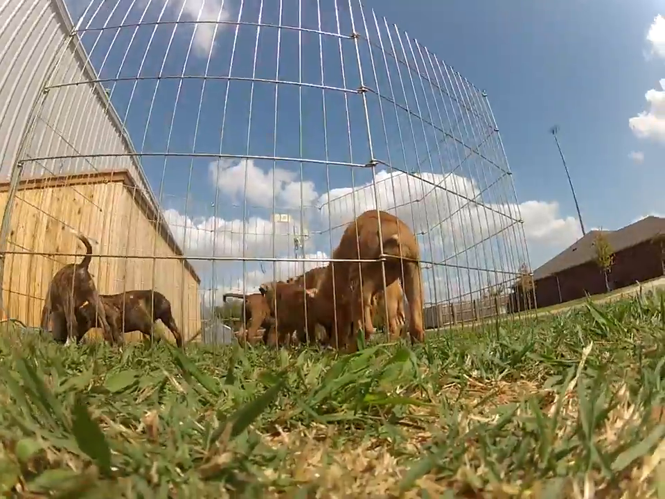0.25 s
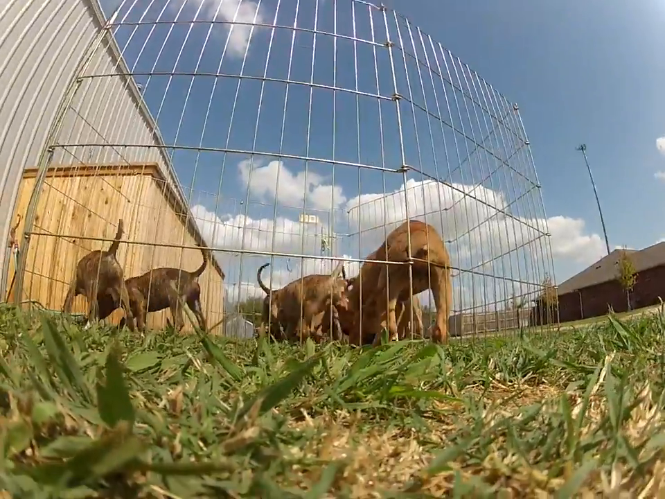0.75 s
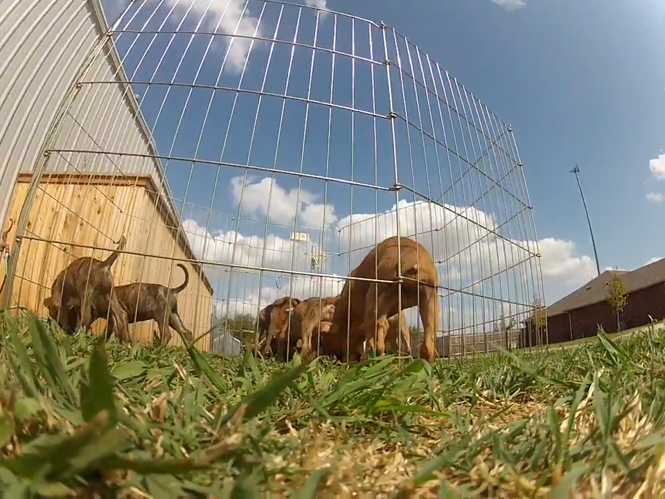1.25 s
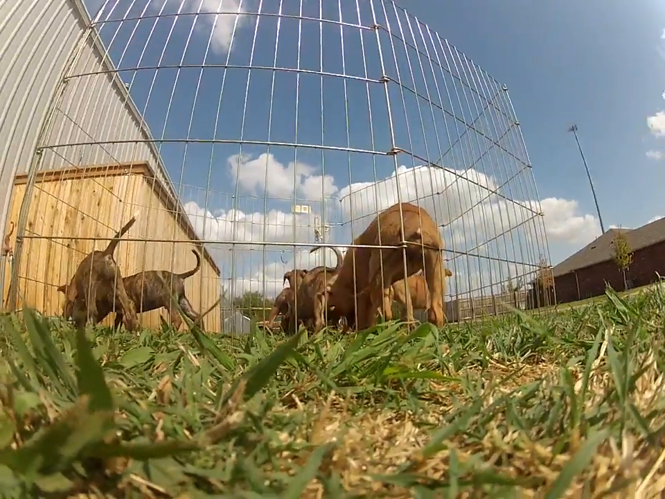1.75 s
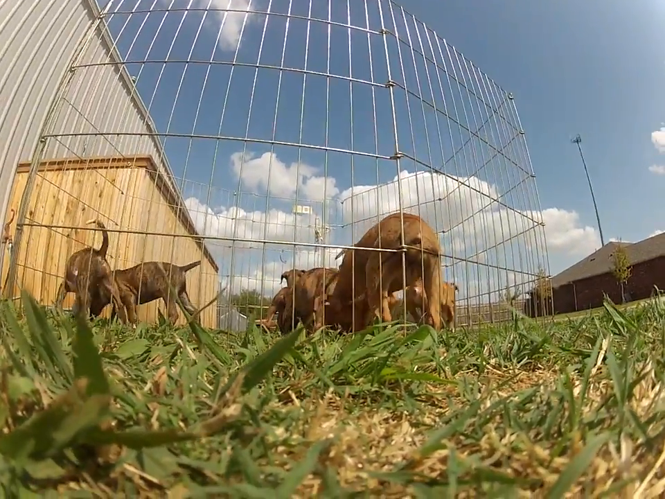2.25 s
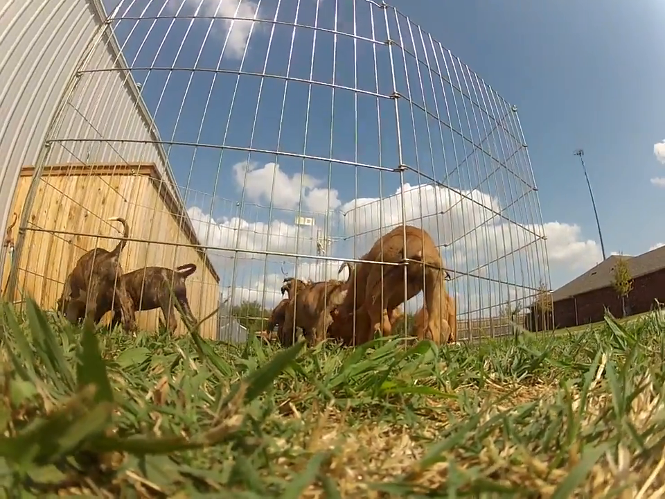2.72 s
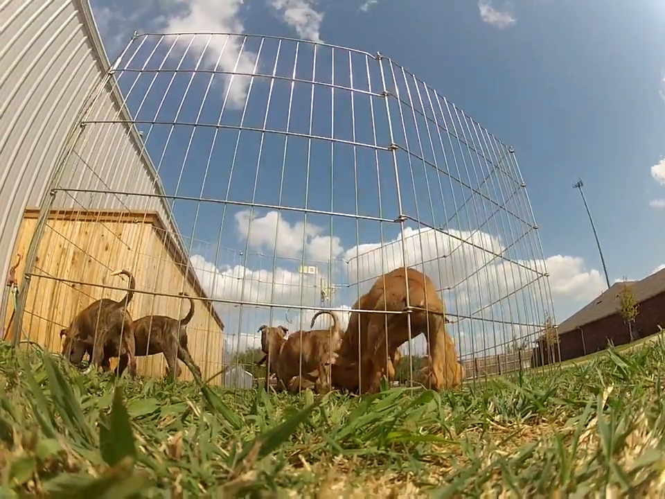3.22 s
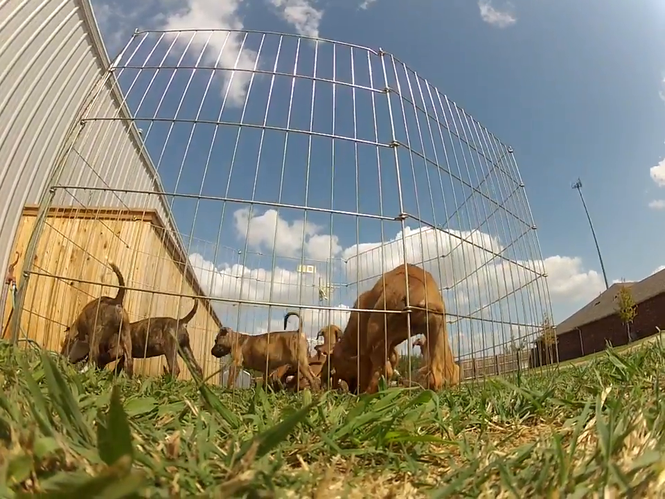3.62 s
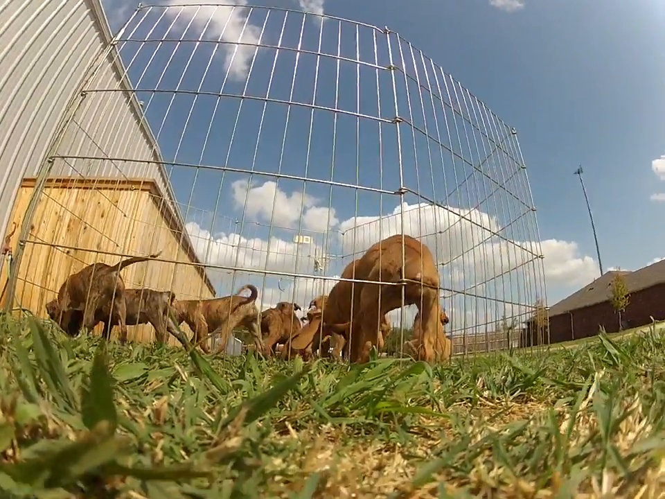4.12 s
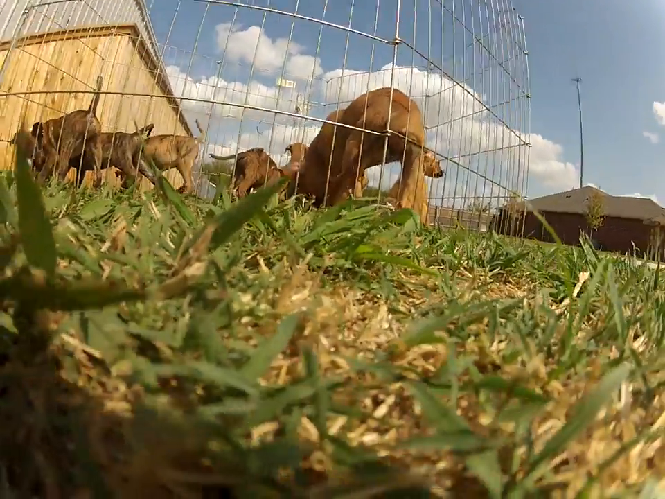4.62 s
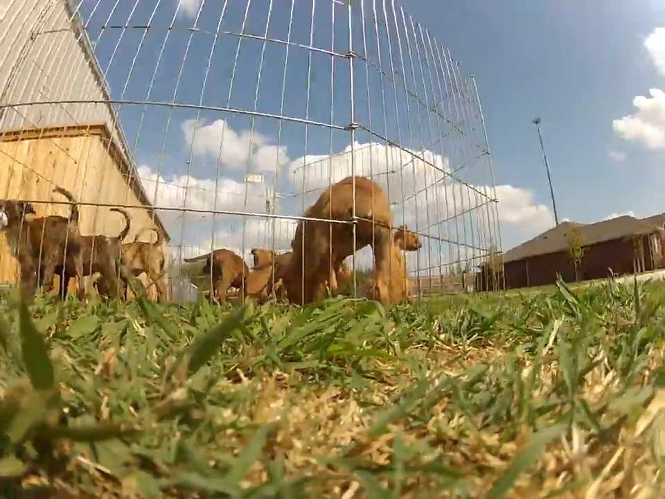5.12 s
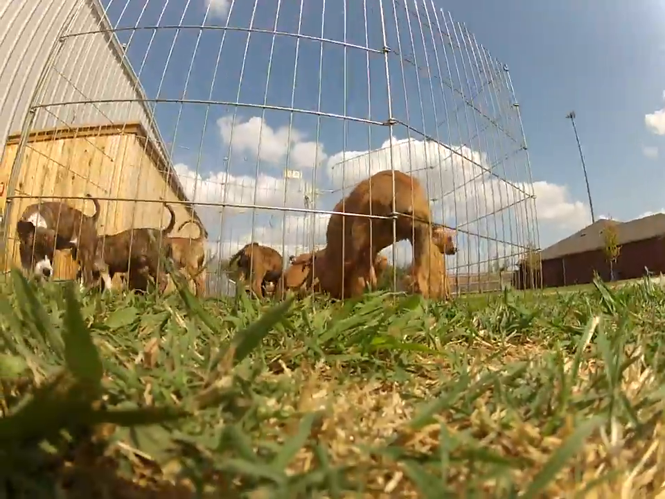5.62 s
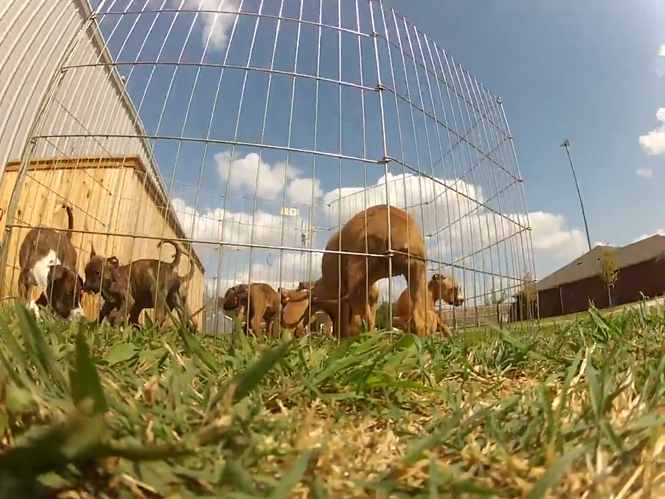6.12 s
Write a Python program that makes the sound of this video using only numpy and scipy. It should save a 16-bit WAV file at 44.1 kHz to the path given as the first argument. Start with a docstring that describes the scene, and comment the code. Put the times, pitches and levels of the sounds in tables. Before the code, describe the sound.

Grass blades brush and snap sharply against a small hard plastic case on a lawn, dry crackles and hollow knocks very close over faint outdoor rumble.

```python
"""Grass against a hard case

A small camera in a hard case slides over a lawn beside a pen of puppies, which stay unheard.
Blades brush, tick and snap: noise bursts coloured by the resonances of the case. Stiffer stalks ring
its shell as decaying sines, and bumps push the whole case as damped swings. Far off a machine hums in
wavering sines over a low outdoor rumble of filtered noise. One microphone feeds two equal channels."""
import sys
import numpy as np
from scipy import signal
from scipy.fft import rfft, irfft, next_fast_len
from scipy.io import wavfile
from scipy.ndimage import uniform_filter1d, map_coordinates

SR = 44100
rng = np.random.default_rng(int(sys.argv[2]) if len(sys.argv) > 2 else 0)


def to_wav(sig):
    """Store sig (one row per channel, or 1-D mono) as 16-bit WAV at the path in sys.argv[1].

    Samples outside -1..1 are clipped; the rate is SR.
    """
    pcm = np.clip(np.atleast_2d(sig), -1, 1) * 32767
    pcm = np.round(pcm).astype(np.int16)
    wavfile.write(sys.argv[1], SR, pcm.T)  # frames by channels


N = 280381


def amp(db):
    """Decibel law: level to amplitude ratio."""
    return 10 ** (np.asarray(db) / 20)


def unit(x):
    """Normalisation to an effective (RMS) value of one."""
    return x / np.sqrt(np.mean(x ** 2) + 1e-20)


def along(points, hz):
    """Spectral envelope: (Hz, value) points joined on a logarithmic frequency axis."""
    f, v = np.transpose(points)
    return np.interp(np.log(hz + 1), np.log(f + 1), v)


def curves(rows):
    """Linear interpolation in time: one value per sample for each column after the time."""
    s, *columns = np.transpose(rows)
    return [np.interp(np.arange(N) / SR, s, column) for column in columns]


def wobble(rate):
    """Slow random modulation: a smooth curve through random knots, rate of them a second."""
    knots = rng.standard_normal(int(N * rate / SR) + 4)
    return map_coordinates(knots, [np.arange(N) * rate / SR])


def filtered(x, response):
    """Linear filtering: the spectrum of x times a response of frequency."""
    m = next_fast_len(N + SR // 2)
    return irfft(rfft(x, m) * response(np.fft.rfftfreq(m, 1 / SR)), m)[..., :N]


def causal(gain, size=4096):
    """Minimum phase: folding the cepstrum makes a filter ring only after its click; unit energy."""
    cepstrum = irfft(np.log(gain(np.fft.rfftfreq(size, 1 / SR)) + 1e-6))
    cepstrum[1:size // 2] *= 2
    cepstrum[size // 2 + 1:] = 0
    response = irfft(np.exp(rfft(cepstrum)))[:size // 4]
    return response / np.linalg.norm(response)


def add(track, s, sound):
    """Superposition: mixes a short sound in at s seconds."""
    part = track[round(s * SR):][:len(sound)]
    part += sound[:len(part)]


def lows(x, hz):
    """First-order low-pass: a gentle slope above hz."""
    return signal.lfilter(*signal.butter(1, hz, fs=SR), x)


# Outdoor rumble and a faint hiss. Each row: frequency in Hz, relative spectral density in dB per Hz.
RUMBLE = [(20, -25.5), (45, -7), (80, -9), (112, -2.5), (135, -7), (165, -7), (300, -12.5), (520, -17),
          (800, -34.5), (3000, -42.5), (6000, -50), (12000, -49.5)]
# Hum of the far machine. Each row: pitch in Hz, RMS level in dB, wavering in dB.
HUM = [(55, -48, 1.4), (410.7, -57.5, .6)]


def distance():
    """Amplitude and frequency modulation: wavering hum lines over an uneven noise rumble."""
    hum = 0
    for hz, db, waver_db in HUM:
        level = np.sqrt(2) * amp(db + waver_db * wobble(7))
        phase = 2 * np.pi * np.cumsum(hz + 0.71 * wobble(8.8)) / SR
        hum = hum + level * np.sin(phase)
    rumble = filtered(rng.standard_normal(N), lambda f: amp(along(RUMBLE, f)))
    rumble_db = -43.5 + .7 * wobble(3) + .8 * wobble(13)
    return hum + amp(rumble_db) * unit(rumble)


# Faint contact with the lawn between strokes. Each row: time in seconds, gain in dB.
CONTACT = [(0, -36), (.3, -43.5), (1.0, -41.5), (1.87, -45.5), (2.1, -40), (3.2, -38), (3.3, -47),
           (3.7, -56.5), (4.1, -44.5), (4.7, -40.5), (5.05, -46), (5.5, -44), (5.8, -50.5), (6.36, -43.5)]
# Tufts dragging across the case. Each row: start in seconds, length in seconds, gain in dB.
STROKES = [(0.089, 0.1, -27), (0.348, 0.062, -31), (0.422, 0.11, -36), (0.552, 0.038, -32),
           (0.769, 0.14, -36.5), (0.902, 0.19, -37.5), (1.141, 0.17, -36.5), (1.435, 0.16, -36.5),
           (1.677, 0.14, -37.5), (1.91, 0.11, -40.5), (2.42, 0.16, -34.5), (2.756, 0.07, -36.5),
           (2.884, 0.11, -33.5), (3.005, 0.039, -31), (3.243, 0.013, -32), (4.001, 0.058, -39.5),
           (4.164, 0.078, -40), (4.266, 0.058, -37.5), (4.448, 0.08, -40.5), (4.588, 0.035, -38),
           (4.814, 0.1, -34.5), (5.08, 0.012, -25), (5.104, 0.12, -41.5), (5.353, 0.02, -39.5),
           (5.456, 0.07, -36.5), (5.572, 0.028, -41.5), (6.133, 0.075, -43.5), (6.292, 0.05, -36.5)]
SWELL_DB, FADE_DB = 27.5, 37  # rise before and fall after a stroke, in dB over its own length


def pressure():
    """Addition of powers: strokes that swell, hold and fade join the faint contact; gives a gain."""
    t = np.arange(N) / SR
    power = amp(2 * curves(CONTACT)[0])
    for s, length, db in STROKES:
        swell_db = SWELL_DB * (s - t)
        fade_db = FADE_DB * (t - s - length)
        down_db = np.maximum(swell_db, fade_db) / max(length, .01)
        power = power + amp(2 * (db - np.maximum(down_db, 0)))
    return np.sqrt(power)


# Cancellations inside the case. Each row: centre in Hz, width in Hz, gain at the centre in dB.
NOTCH = [(2430, 176, -7.5), (5990, 520, -9), (1605, 197, -5.5), (12080, 2850, -41.5), (4190, 67, -4.5)]


def notches(hz):
    """Destructive interference: gain left by the cancellations."""
    gains = [np.hypot(hz - centre, amp(db) * width) / np.hypot(hz - centre, width)
             for centre, width, db in NOTCH]
    return np.prod(gains, axis=0)


def path(spectrum):
    """Impulse response: a way into the microphone, with its resonances and cancellations."""
    return causal(lambda hz: amp(along(spectrum, hz)) * notches(hz))


def patchy(x, depth_db):
    """Time-frequency modulation: each moment and band gets its own gain, as blades differ in size."""
    z = signal.stft(x, nperseg=256)[2]
    field = uniform_filter1d(rng.standard_normal(z.shape), size=5, axis=0)
    field = uniform_filter1d(field, size=3, axis=1)
    rustle = signal.istft(z * amp(depth_db * unit(field)), nperseg=256)[1][:N]
    return unit(rustle)


# The air cavity behind the port rings sharply. Each row: frequency in Hz, relative gain in dB.
CASE = [(1000, -22), (2000, -14.5), (2600, -9), (3050, -3.5), (3800, -7), (4250, -16), (6000, -28),
        (7700, -23), (8200, -12.5), (8900, -10.5), (9500, -19.5), (11000, -36), (14300, -38), (15000, -9.5)]
# The plastic shell passes a broader sound. Each row: frequency in Hz, relative gain in dB.
SHELL = [(500, -3.5), (1050, 3.5), (2000, 6.5), (2500, 5), (3900, 2), (5200, -1.5), (6400, -3.5),
         (8200, -3), (10300, -8), (14000, -6.5)]
# Brushing through the shell against the port. Each row: time in seconds, shell level over port in dB.
LAID = [(0, -23), (.24, -9.5), (.8, -3), (1.5, -0.5), (2.3, 0), (3.8, -3), (4.4, -1.5), (4.9, -6),
        (5.4, 0.5)]


def brushing():
    """Stick-slip friction: clumped tiny ticks, denser under pressure, over a fine uneven hiss.

    Port and shell meet different blades, so each has its own ticks and noise."""
    shell_db, = curves(LAID)
    press = pressure()
    # slips a second: about 360 at the median pressure
    rate = 360 * np.sqrt(press / np.median(press)) * amp(2.5 * wobble(30))
    sizes_db = np.minimum(5.5 * rng.exponential(size=(2, N)), 9)
    slips = (rng.random((2, N)) < rate / SR) * amp(sizes_db)
    ticks = signal.lfilter([1], [1, -np.exp(-1 / (.00035 * SR))], slips)  # decay 0.35 ms
    hiss = amp(2.5 * wobble(70))
    shape = unit(unit(ticks) + [[1.0], [.8]] * hiss)  # rows: port, shell
    rustles = shape * rng.standard_normal((2, N))
    ringing, broad = [patchy(x, depth_db=2.5) for x in rustles]
    through_port = signal.fftconvolve(ringing, path(CASE))[:N]
    through_shell = signal.fftconvolve(broad, path(SHELL))[:N]
    rub = through_port + amp(shell_db) * through_shell
    return press * rub / np.hypot(1, amp(shell_db))  # the share leaves the total power alone


# Blades snapping on the case. Each row: start in seconds, peak in dB before the preamplifier,
# gain of the treble in dB, shell path over port path in dB.
SNAPS = [(0.0998, -5, 8, -30), (0.1326, -8, 6, -30), (0.15, -12, 6, -30), (0.1603, -7, 6, -30),
         (0.26, -15.5, 2, -13), (0.3236, -10, 7, -18), (0.3595, -9.5, -12, 12), (0.372, -10.5, 10, -2),
         (0.543, -14, -1, -9), (0.5838, -14, -1, -5), (0.601, -14, 0, -18), (0.7676, -15.5, 13, -10),
         (0.826, -15, -1, -9), (0.9875, -3, -2.5, -20), (0.9948, -1, 10, -8), (0.959, -15.5, 3, -3),
         (1.1665, -8, 2.5, -5), (1.2632, -10.5, 3.5, -2), (1.5241, -1, 3, 0.5), (2.1346, -2, 0, 11),
         (2.205, -20.5, -2, -6), (2.2918, -18, 14, 17), (2.3811, 0, 14, 4), (2.382, 2, 11, -5),
         (2.4, -1.5, 1, -5), (2.4396, 3, 1, -9), (2.4738, -14, 2, 8), (2.5154, 3, 2, -8),
         (2.567, -18, 23, 11), (2.6432, -16, -2, 24), (2.736, -17, 13, 21), (2.8001, -10.5, -3, -13),
         (2.959, -19, -10, 13), (2.9923, -5, 2, -32), (3.0008, -13, -9, 6), (3.0268, -11, -4, -8),
         (3.2432, -8.5, -4.5, -32), (3.5248, -24, -1, -37), (3.8818, -21.5, -1.5, -1),
         (4.2675, -14.5, 13, -2), (4.317, -19, 17, -7), (4.346, -21, -3, 13), (4.4436, -11.5, 0.5, -11),
         (4.535, -15.5, 6, -10), (4.774, -15, 17, -23), (4.857, -12, 1, -15), (4.9162, -20, 11, 8),
         (4.9315, -14, 0, 0), (4.997, -18.5, 0, 8), (5.1571, -16.5, 4, 4), (5.5735, -6, 11.5, -10),
         (5.595, -15, 13, 13), (5.9531, -7.5, 3, -37), (5.968, -19, -10, -9), (5.971, -8.5, 2, -26),
         (5.9973, -9.5, 4, -10)]
# The clearest blades flicking off the case. Each row: start in seconds, peak in dB.
TICKS = [(.282, -24.5), (0.344, -18.5), (0.7592, -25), (0.94, -24), (1.100, -20), (1.139, -21),
         (1.370, -22.5), (1.603, -17.5), (1.6225, -22), (1.790, -24), (1.923, -21), (1.964, -21.5),
         (1.982, -25), (2.114, -22.5), (2.228, -27), (2.279, -20.5), (2.486, -21), (2.612, -35),
         (3.179, -23), (3.356, -30), (3.413, -32), (3.591, -32), (3.808, -29), (3.847, -26), (4.325, -32),
         (4.363, -18), (4.401, -20), (4.471, -24), (4.495, -24), (4.625, -22.5), (4.942, -25.5),
         (5.293, -21.5), (5.488, -21), (6.131, -27), (6.203, -22), (6.297, -17.5)]
# Decay by way in. Each row: shell path over port path in dB, decay time constant in seconds.
SNAP_S = [(-20, 0.0011), (-12.5, 0.00097), (13.5, 0.0011)]


def snaps():
    """Impulsive excitation: a fast broadband burst dies away with a weak after-rattle.

    A tick reaches port and shell in the same proportion as the brushing does."""
    track, t = np.zeros(N), np.arange(SR // 20) / SR
    case, shell = path(CASE), path(SHELL)
    ticks = [(s, db, 4, np.interp(s, *np.transpose(LAID))) for s, db in TICKS]
    for s, db, bright_db, shell_db in SNAPS + ticks:
        decay = np.interp(shell_db, *np.transpose(SNAP_S))
        crack = (1 - np.exp(-t / .0002)) * np.exp(-t / decay)
        rattle = .05 * np.exp(-t / .0044)
        z = rfft((crack + rattle) * rng.standard_normal(len(t)))
        # a break excites all frequencies about evenly
        even = z / np.sqrt(uniform_filter1d(np.abs(z) ** 2, size=40))
        burst = irfft(even)[:len(t) // 2]
        low = lows(burst, hz=3580)
        tilted = low + amp(bright_db) * (burst - low)
        sound = signal.fftconvolve(tilted, case + amp(shell_db) * shell)
        add(track, s, amp(db) * sound / np.abs(sound).max())
    return track


# Stalks knocking the shell. Each row: start in seconds, starting level of the main mode in dB, pitch in Hz.
KNOCKS = [(0.2449, -29, 385), (2.1345, -1, 2700), (2.3832, -9, 577), (2.5152, -17.5, 570),
          (2.6436, -16.5, 1860), (2.736, -17.5, 1900), (2.801, -10.5, 1840), (2.895, -22, 1000),
          (2.935, -20, 990), (3.0008, -13.5, 1030), (3.0282, -11, 945), (3.243, -19, 1120),
          (3.2435, -6.5, 2770), (3.881, -28.5, 920), (4.916, -24, 1110), (5.9535, -12.5, 2740),
          (5.97, -24, 920), (5.996, -18, 1080)]


def knocks():
    """Damped modes: a stalk rings the plastic shell in two partials for a few cycles."""
    track, t = np.zeros(N), np.arange(SR // 20) / SR
    for s, db, hz in KNOCKS:
        ring = np.sin(2 * np.pi * hz * t) + 0.17 * np.sin(2 * np.pi * 1.56 * hz * t)
        add(track, s, -amp(db - 60 * t * hz / 12) * ring)  # 60 dB down after 12 cycles
    return track


# The case bumping the ground. Each row: start in seconds, level before damping in dB,
# length of the push in seconds (held to 1 ms or more).
BUMPS = [(2.382, -4.5, 0.0016), (2.439, -17, 0.0028), (2.514, -30, 0.00093), (2.745, -23, 0.0027),
         (2.897, -16, 0.0024), (5.728, -24, 0.0048)]


def bumps():
    """Damped oscillation: one soft push of the whole case and its weaker rebounds."""
    track, t = np.zeros(N), np.arange(SR // 20) / SR
    for s, db, length in BUMPS:
        u = t / np.clip(length, .001, .02)  # time in push lengths
        add(track, s, -amp(db) * np.sin(np.pi * u) * np.exp(-.9 * u))
    return track


def scene():
    """Superposition: all the sources at one microphone, in two equal channels."""
    mono = brushing() + snaps() + knocks() + bumps() + distance()
    return np.tile(mono, (2, 1))


PORT_HZ = 15170  # the microphone input passes little above this


def port(hz):
    """Steep low-pass: the upper edge of the input."""
    return 1 / np.sqrt(1 + (hz / PORT_HZ) ** 240)


TOP = 0.97  # full swing of the preamplifier
TOP_HZ = 16640  # band limit, reached by a slope 300 Hz wide


def record(dry):
    """Band limiting and saturation: treble edge, rounded loud peaks, nothing kept above the limit."""
    heard = filtered(dry, port)
    held = heard / (1 + np.abs(heard / TOP) ** 6) ** (1 / 6)
    return filtered(held, lambda hz: np.clip((TOP_HZ - hz) / 300, 0, 1))


dry = scene()
out = record(dry)
to_wav(out)
```